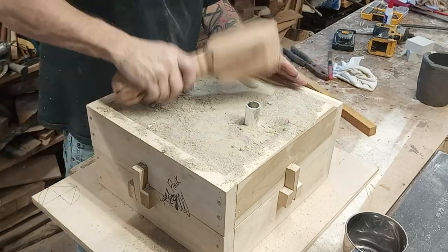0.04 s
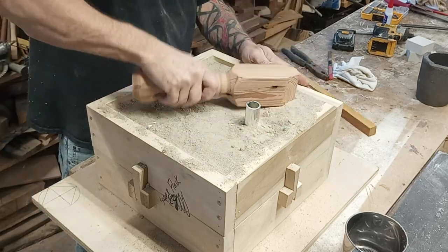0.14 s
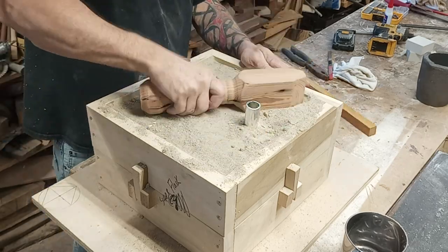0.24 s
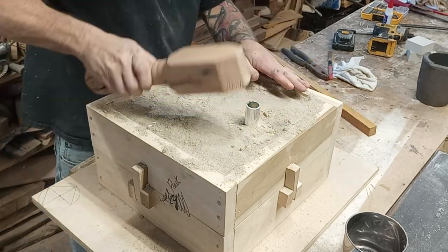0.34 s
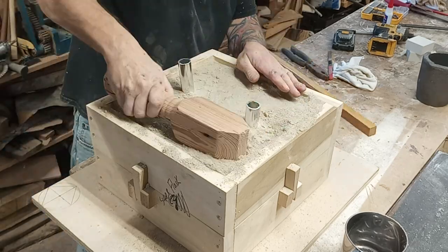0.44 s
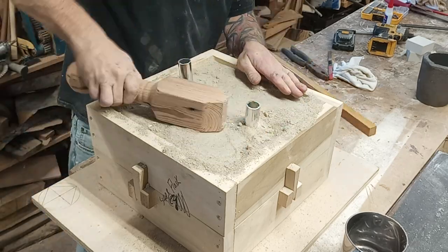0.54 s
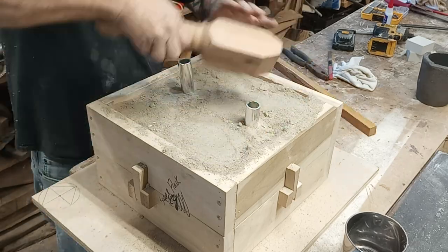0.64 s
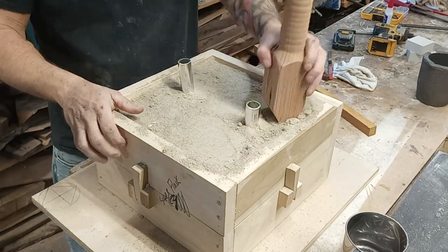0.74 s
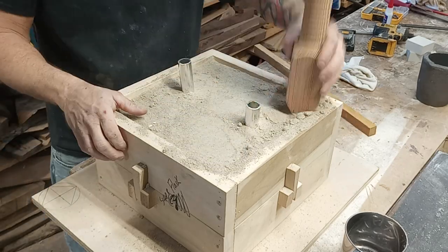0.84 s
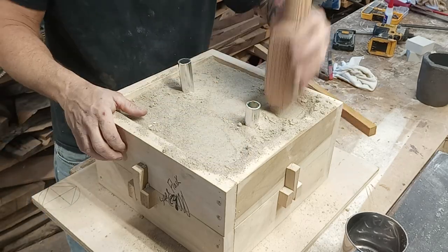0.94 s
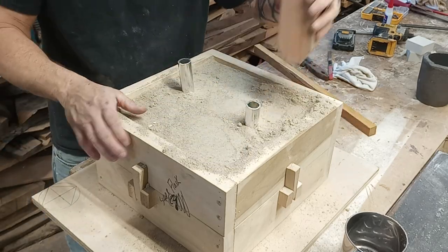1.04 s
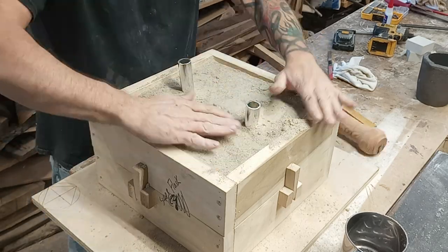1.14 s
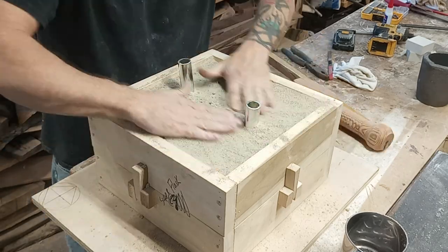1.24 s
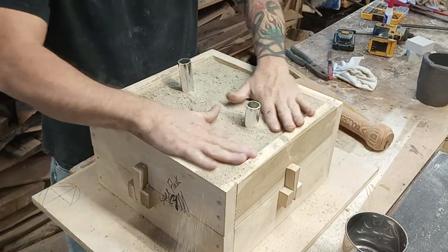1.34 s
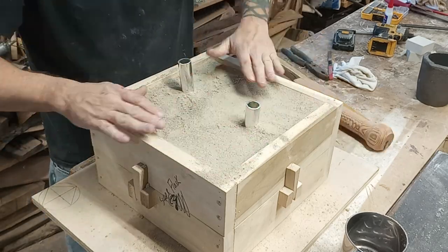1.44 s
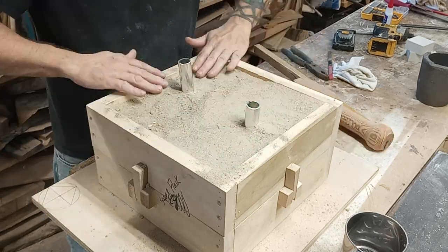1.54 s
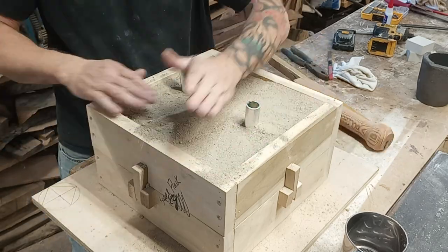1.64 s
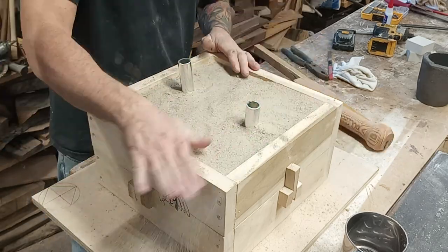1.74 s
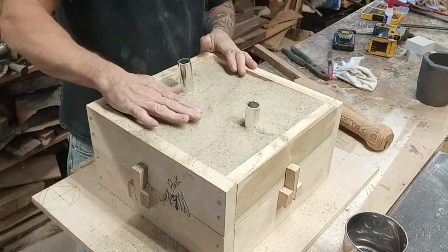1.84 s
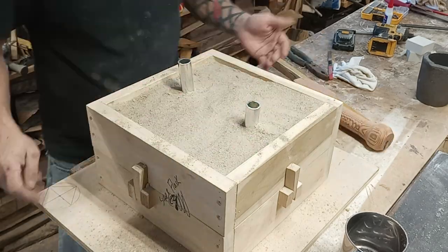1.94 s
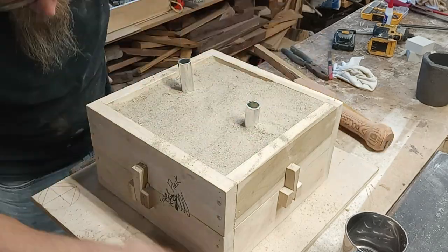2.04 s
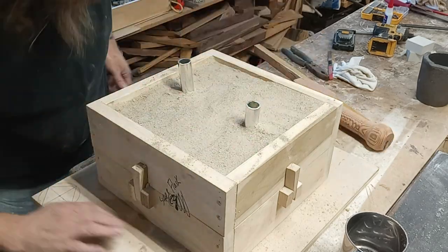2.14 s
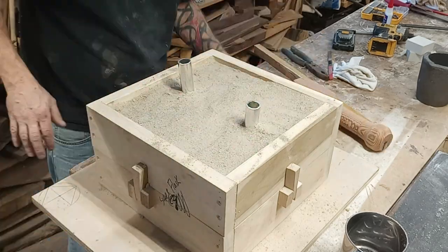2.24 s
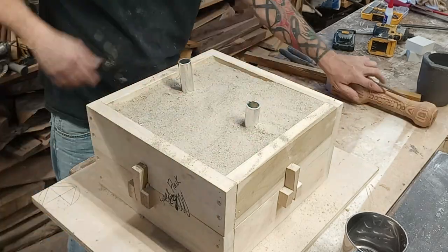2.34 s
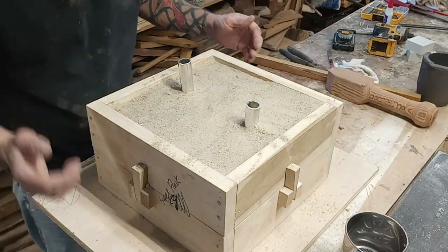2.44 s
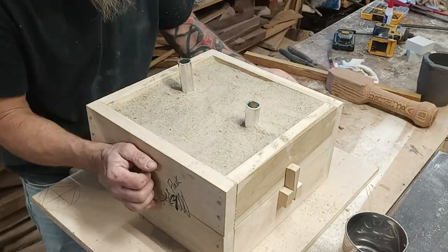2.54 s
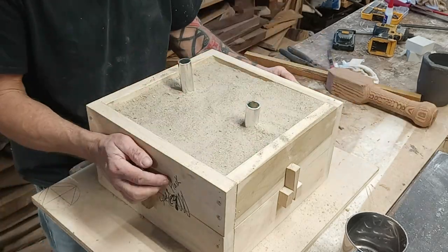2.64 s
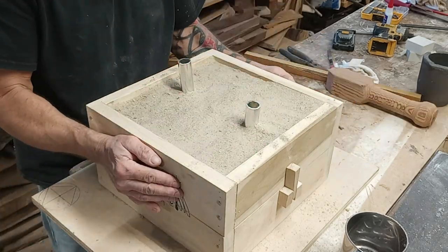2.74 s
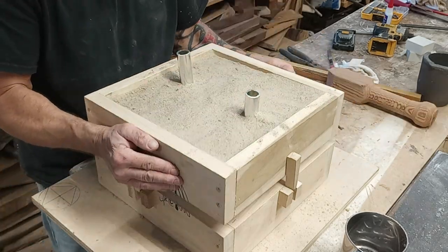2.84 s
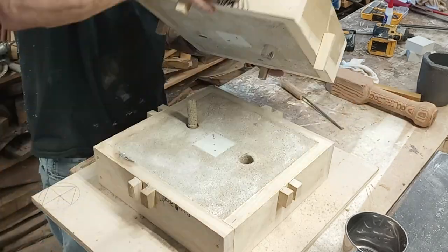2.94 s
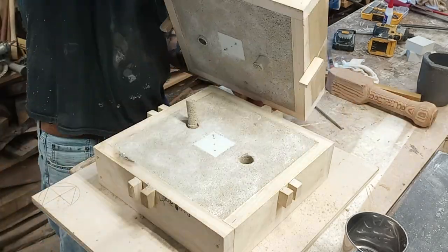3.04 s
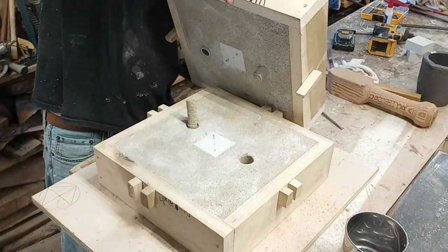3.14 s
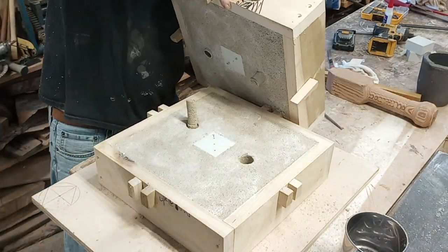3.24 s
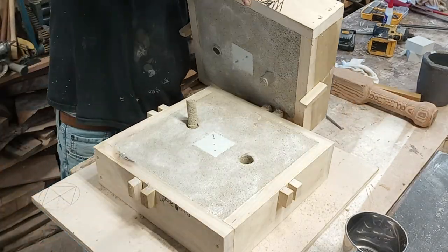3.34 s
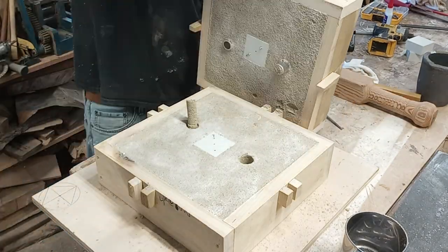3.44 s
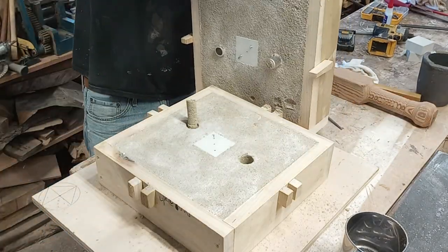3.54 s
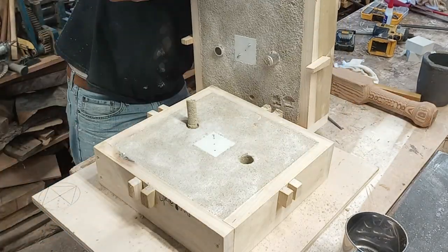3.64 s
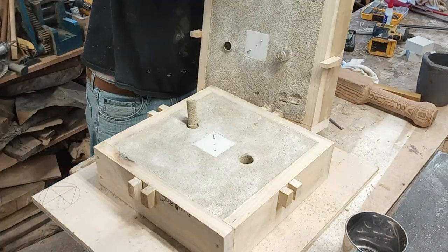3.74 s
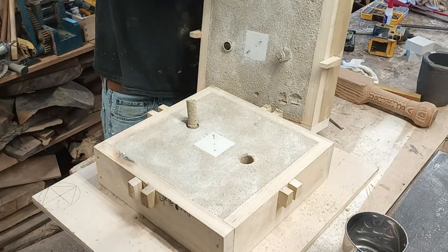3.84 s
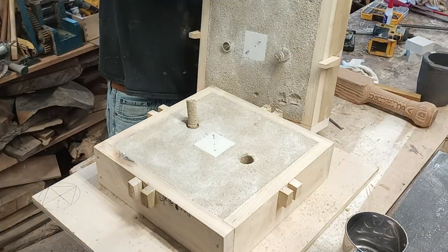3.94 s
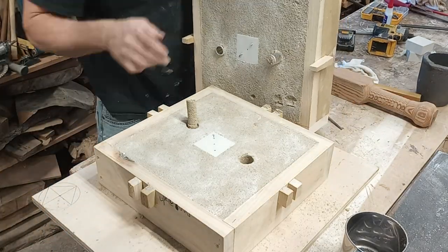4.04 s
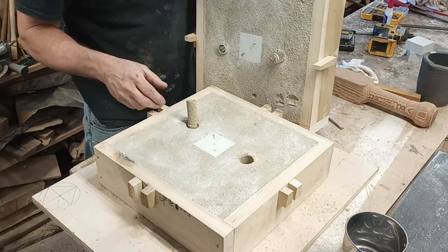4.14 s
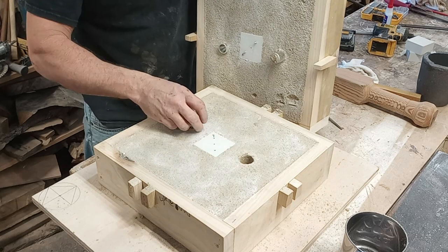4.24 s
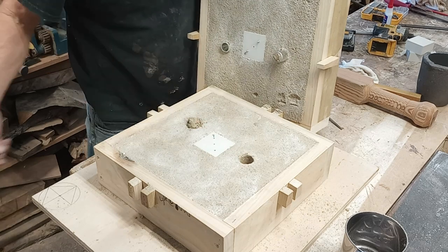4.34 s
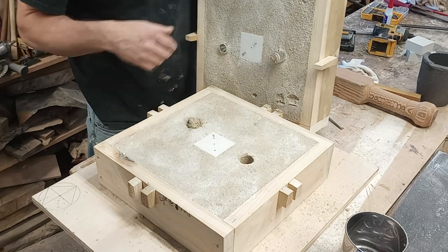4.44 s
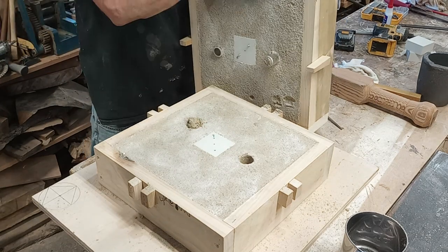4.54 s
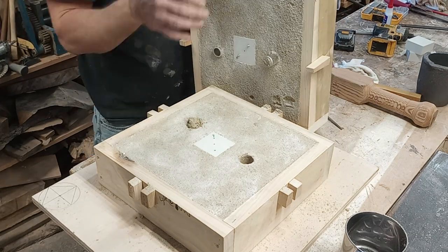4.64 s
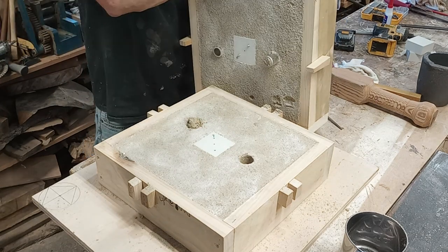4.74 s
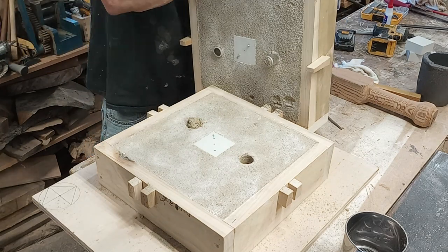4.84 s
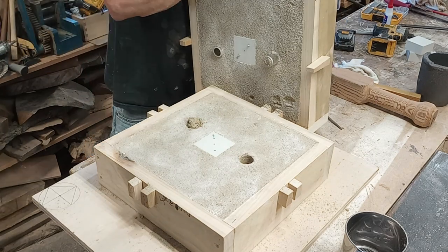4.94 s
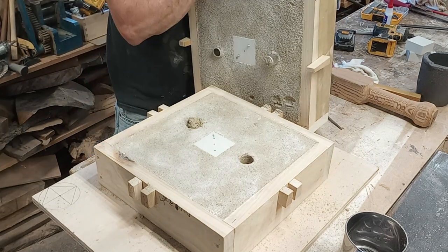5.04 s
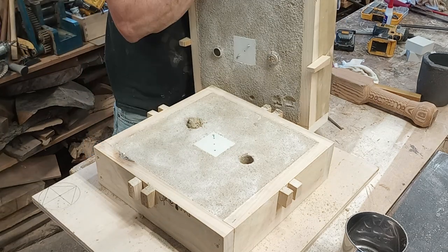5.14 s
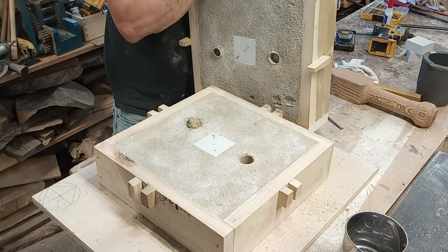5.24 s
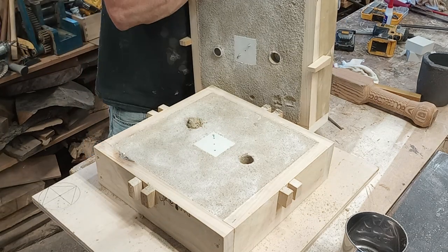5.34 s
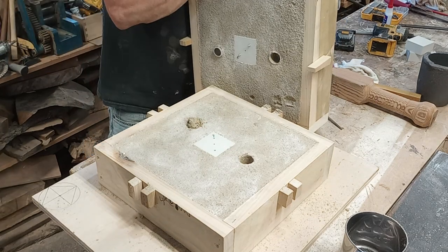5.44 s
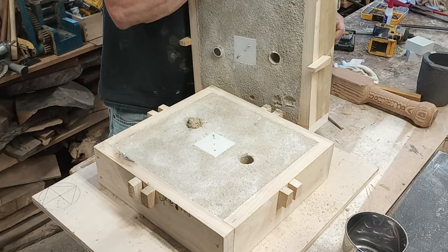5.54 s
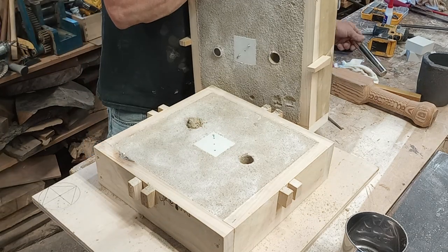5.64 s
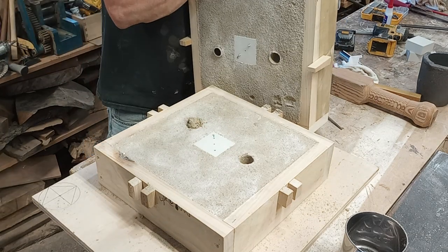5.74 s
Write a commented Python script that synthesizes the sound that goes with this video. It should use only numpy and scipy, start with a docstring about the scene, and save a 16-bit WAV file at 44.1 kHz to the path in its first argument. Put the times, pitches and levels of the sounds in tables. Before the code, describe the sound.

Close to a workbench, a wooden rammer tamps sand in a wooden box in very quick, uneven thumps with gritty crunch and hard woody knocks, ending just after one second. Short hissing hand sweeps follow, then the box is shoved and judders free. Faint scrapes give way to low wavering hum and ventilation, until one sharp knock near the end.

```python
"""Packing sand into a moulding box

A wooden rammer packs sand into a wooden moulding box in very quick, short strokes. Each is a resonant thump,
a chatter of tiny contacts through wood modes and a crunch of filtered grains; sharp knocks ring the same wood.
Hands sweep loose sand away as swells of hiss, over a faint trickle. The upper box is shoved, judders off its
guide pins and is stood on edge; one last knock sounds over filtered workshop noise and wavering low hum."""
import sys
import numpy as np
from scipy import signal
from scipy.fft import rfft, irfft
from scipy.io import wavfile
from scipy.ndimage import uniform_filter1d

SR = 44100
rng = np.random.default_rng(int(sys.argv[2]) if len(sys.argv) > 2 else 0)


def store_pcm(level_fs):
    """Save levels as 16-bit WAV."""
    pcm = np.round(np.clip(level_fs, -1, 1) * 32767).astype(np.int16)
    wavfile.write(sys.argv[1], SR, np.atleast_2d(pcm).T)


N = 255339  # samples in the scene
SIZE = 8192  # samples in one short sound
T = np.arange(SIZE) / SR
HZ = np.maximum(np.fft.rfftfreq(SIZE, 1 / SR), 1)
LONG_HZ = np.maximum(np.fft.rfftfreq(N, 1 / SR), 1)

# modes of the sand-filled box: (frequency [Hz], width [Hz], level [dB])
BOX_MODES = [(363, 202, -1), (499.2, 163, -1), (590.8, 53, -2.5), (686, 48, -7.5), (770, 80, -9),
             (949, 230, -16)]
# modes of the hardwood rammer and the stiff frame corners: (frequency [Hz], width [Hz], level [dB])
HARDWOOD_MODES = [(1064, 72, 4.5), (1277, 73, 1.5), (1409, 140, 2), (1527, 150, 3), (1900, 190, -6),
                  (2294, 130, -10.5), (2560, 660, -19), (3320, 57, -22)]
# spectrum of boards rubbed by sand: (frequency [Hz], level [dB])
RUB_SPECTRUM = [(150, -13), (400, -4), (600, 0), (760, -4), (980, 1), (1500, -2), (2100, -6), (3400, -24)]
# spectrum of grains skidding over wood: (frequency [Hz], level [dB])
HISS_SPECTRUM = [(1100, -15.5), (2100, 0), (3150, 1), (4300, 0.5), (5800, 4.5), (6800, 0.5), (8000, -19),
                 (12000, -37.5)]
# spectrum of the finest dust: (frequency [Hz], level [dB])
DUST_SPECTRUM = [(5500, -19), (8300, -7.5), (11000, -4), (14000, -3.5), (15100, 2), (16500, 0)]


def undb(db):
    """Decibels to gain."""
    return 10 ** (np.asarray(db) / 20)


def between(ends, hardness):
    """Slide from the soft value to the hard one."""
    return ends[0] + (ends[1] - ends[0]) * hardness


def gains(points, hz):
    """Gain of a (Hz, dB) spectrum, interpolated over log frequency."""
    f, db = np.transpose(points)
    return undb(np.interp(np.log(hz), np.log(f), db))


def causal(gain):
    """Minimum-phase response with this gain: nothing sounds before the contact."""
    cepstrum = irfft(np.log(gain + 1e-6))
    cepstrum[1:SIZE // 2] *= 2
    cepstrum[SIZE // 2 + 1:] = 0
    return np.exp(rfft(cepstrum))


def resonance(hz, width, f=HZ):
    """Response of one damped mode, gain 1 at its centre."""
    return 1 / (1 + 1j * (f / hz - hz / f) * hz / width)


def body(modes, place_db, detune):
    """Modes as met from one striking place; the response falls away outside their range."""
    hz, width, db = np.transpose(modes)
    total = 0
    for k in range(len(hz)):
        level_chance, pitch_chance = rng.standard_normal(2)
        gain = (-1) ** k * undb(db[k] + place_db * level_chance)  # neighbours in opposite phase
        total = total + gain * resonance(hz[k] * (1 + detune * pitch_chance), width[k])
    return total * resonance(np.sqrt(hz[0] * hz[-1]), 2.4 * (hz[-1] - hz[0]))


def grains(rate, scatter_db):
    """Tiny contacts at random moments (rate per second), a few much harder than the rest."""
    hit = rng.random(SIZE) < rate / SR
    return hit * rng.choice([-1, 1], SIZE) * undb(scatter_db * rng.standard_normal(SIZE))


def pressure(length, peak):
    """Contact pressure: rises until the share `peak` of its length, then lets go."""
    peak = np.clip(peak, .05, .9)
    return np.sin(np.interp(T / length, [0, peak, 1], [0, np.pi / 2, np.pi]))


def radiate(force, response, db, length, bench_s=0.0014):
    """A force sounds through a body at an rms level; quick reflections off the bench make the two ears differ."""
    # side against mid: (frequency [Hz], level [dB])
    side_spectrum = [(60, -21), (130, -19), (260, -14), (500, -6), (1000, 0), (2000, 1), (5000, 0),
                     (15000, -.5)]
    mid = rfft(force) * response
    mirrored = mid * rfft(rng.standard_normal(SIZE) * np.exp(-T / bench_s))
    match = np.linalg.norm(mid) / (np.linalg.norm(mirrored) + 1e-18)
    side = mirrored * match * causal(gains(side_spectrum, HZ))
    pair = irfft(np.array([mid + side, mid - side]))
    pair *= np.minimum(1, 2 * (1 - T / T[-1]))  # fade the second half out
    return pair * undb(db) * np.sqrt(length * SR / (np.sum(pair ** 2) / 2 + 1e-18))


def add(out, s, sound):
    """Mix a sound in at its time in seconds."""
    i = max(int(s * SR), 0)
    out[:, i:i + SIZE] += sound[:, :N - i]


def thud(hz, db, length, damping, settle_db):
    """The packed box is pushed once and swings a few times; the sand settles under the push in small slips."""
    width = damping / length
    push = np.exp(-((T - .24 * length) / 0.00056) ** 2)
    packed_box = resonance(hz, width) * resonance(0.82 * hz, 1.54 * width)
    swing = radiate(-push, packed_box, db - 4.0, length)
    slips = grains(4000, 3) * pressure(length, .42)
    deep_sand = resonance(0.32 * hz, 190) * resonance(130, 930)
    return swing + radiate(slips, deep_sand, db + settle_db, length)


def strokes():
    """The rammer thumps the sand, chatters over the wood and crushes grains for as long as it presses."""
    # rammer strokes, then shoves of the box:
    # (time [s], length [s], strength [dB], hardness [0 = into deep sand, 1 = wood on wood])
    stroke_list = [(.001, 0.012, -18, 0.53), (.015, 0.021, -29, 0.61), (0.088, 0.02, -27.5, 0.82),
                   (0.111, 0.022, -25.5, .65), (.143, 0.02, -25.5, 0.66), (.169, .015, -24.5, 0.65),
                   (.192, .016, -19.5, 0.14), (.225, .022, -20, 0.68), (.251, .023, -19.5, 0.47),
                   (0.279, 0.021, -18, 0.5), (.303, .025, -18.5, 0.84), (.328, 0.021, -27.5, 0.89),
                   (.347, .031, -22, 0.74), (.429, 0.01, -38, 0.37), (.455, 0.015, -37.5, 0.57),
                   (.479, 0.021, -24, 0.56), (.515, .029, -26.5, 0.84), (.554, 0.012, -22.5, 0.8),
                   (.573, 0.032, -22.5, 0.69), (.632, 0.014, -22.5, 0.63), (.651, 0.024, -20, 0.7),
                   (.686, .012, -25.5, 0.96), (.785, 0.061, -32.5, 0.078), (0.853, 0.026, -23.5, 0.4),
                   (0.88, .02, -29.5, 0.075), (0.907, 0.031, -29.5, 0.23), (.957, 0.0141, -19.5, 0.45),
                   (.974, .023, -19.5, 0.32), (1.008, 0.02, -18.5, 0.066), (1.031, 0.016, -27.5, 0.11),
                   (1.05, .02, -24.5, 0.18), (1.074, .024, -21, 0.39), (1.152, 0.015, -19.5, 0.51),
                   (1.181, 0.033, -23, 0.68), (1.219, .016, -14.5, .4), (2.35, .024, -22.5, 0.644),
                   (2.367, 0.031, -19, 0.49), (2.425, 0.042, -36, 0.56), (2.472, 0.035, -29, 0.68)]
    # thud pitch: (at hardness 0 [Hz], at hardness 1 [Hz])
    thud_pitch = (190.3, 300.1)
    # chatter of box and hardwood, relative to the strength: (at hardness 0 [dB], at hardness 1 [dB])
    box_chatter = (-20, 3.5)
    wood_chatter = (-46.5, 3)
    # crunch of loose sand relative to the strength, low where the face is packed: (time [s], level [dB])
    loose_sand = [(0, -17.5), (.02, -20), (.165, -45), (.2, -16), (.44, -33), (.48, -14), (.58, -19),
                  (.635, -35.5), (.7, -14), (1.15, -21), (1.22, -28.5), (2.35, -9), (2.37, -27.5),
                  (2.43, -48)]
    # spectrum of crushed sand: (frequency [Hz], level [dB])
    crunch_spectrum = [(900, -20), (2200, -1), (4000, 2), (6300, 3.5), (7800, -2.5), (11000, -1),
                       (14000, 0), (15200, 7), (16500, -7.5)]
    out = np.zeros((2, N))
    crunch = causal(gains(crunch_spectrum, HZ))
    for s, length, thud_db, hardness in stroke_list:
        hz = between(thud_pitch, hardness)
        box_db = thud_db + between(box_chatter, hardness)
        wood_db = thud_db + between(wood_chatter, hardness)
        sand_db = thud_db + np.interp(s, *np.transpose(loose_sand))
        press = pressure(length, 0.37)
        chatter = grains(4000, 4) * press ** 1.8
        crushed = grains(15000, 7.0) * press ** 0.82
        sound = thud(hz, thud_db, length, damping=1.9, settle_db=-9.0)
        sound += radiate(chatter, body(BOX_MODES, 2.2, .03), box_db, length)
        sound += radiate(chatter, body(HARDWOOD_MODES, 2.17, 0.018), wood_db, length)
        sound += radiate(crushed, crunch, sand_db, length)
        add(out, s, sound)
    return out


def knocks(length=0.0057, rattle_s=0.01, rattle=0.0839, crack_s=0.0036):
    """One hard contact rings all the wood at once; the loose joints rattle and crushed grit cracks."""
    # hard wood-on-wood blows: (time [s], strength [dB], hardness [0-1])
    blow_list = [(.0545, -20.5, .35), (.138, -19, .4), (.311, -23, .7), (.572, -11.5, 0.66),
                 (.655, -20.5, .5), (1.168, -11, 0.64), (1.2212, -19.5, .1), (2.472, -25, 0.98),
                 (2.511, -37.5, 0.97), (3.393, -41, 0.2), (3.563, -52, 0.65), (5.7201, -13.5, 0.79)]
    # thud pitch: (at hardness 0 [Hz], at hardness 1 [Hz])
    knock_pitch = (240, 320)
    # hardwood ring and grit crack, relative to the strength: (at hardness 0 [dB], at hardness 1 [dB])
    wood_ring = (-28, 1.5)
    grit_crack = (-26, -6.5)
    # spectrum of cracking grit: (frequency [Hz], level [dB])
    crack_spectrum = [(1200, -14), (2200, 1), (3600, 0), (4600, -9), (6200, -14), (8000, -30), (12000, -28),
                      (16000, -30)]
    out = np.zeros((2, N))
    crack = causal(gains(crack_spectrum, HZ))
    bench = resonance(105, 70) * resonance(120, 300)
    for s, thud_db, hardness in blow_list:
        hz = between(knock_pitch, hardness)
        wood_db = thud_db + between(wood_ring, hardness)
        crack_db = thud_db + between(grit_crack, hardness)
        blow = rattle * grains(5996, 4.23) * np.exp(-T / rattle_s)
        blow -= np.exp(-((T - .0002) / .00006) ** 2) / 2  # the contact itself
        grit = grains(23000, 4.3) * np.exp(-T / crack_s)
        boards = body(BOX_MODES, 1, .02) * resonance(850, 700)
        sound = radiate(blow, resonance(hz, 190) * resonance(0.42 * hz, 870), thud_db, length)
        sound += radiate(blow, bench, thud_db - 15, length)  # the bench gives a little
        sound += radiate(blow, boards, thud_db - 5, length)
        sound += radiate(blow, body(HARDWOOD_MODES, 1, .03), wood_db, length)
        sound += radiate(grit, crack, crack_db, length)
        add(out, s, sound)
    return out


def judder(rate=1500, fade_s=0.027):
    """Wood sticks and slips on the guide pins, weaker as the box comes free."""
    # the upper box judders up its wooden guide pins: (time [s], length [s], level [dB])
    judder_event = (2.471, 0.035, -30)
    # modes of the guide pins: (frequency [Hz], width [Hz], level [dB])
    pin_modes = [(1180, 82, 1), (1480, 78, -7), (1640, 70, -1), (2215, 90, 0), (2430, 120, 1.5),
                 (2648, 38, 3.5), (2870, 98, 0.5)]
    s, length, db = judder_event
    out = np.zeros((2, N))
    slips = grains(rate, 3) * np.exp(-T / fade_s) * (T < length)
    add(out, s, radiate(slips, body(pin_modes, 0.87, .003), db, length))
    return out


def sweeps(swell=2.94):
    """Loose grains skid over the boards: a quick swell of hiss that trails away."""
    # sand brushed, slid or spilled over wood:
    # (time [s], nominal length [s], hiss level [dB], lightness [dB, up = fine dust, down = rubbed boards])
    sweep_list = [(0.703, 0.021, -52, 5), (1.315, 0.022, -68, -3), (1.418, 0.022, -64.5, 7),
                  (1.453, 0.038, -57, 2.5), (1.764, 0.023, -59.5, 4), (1.791, 0.017, -33.5, 5),
                  (1.798, 0.076, -44, 3.5), (1.915, 0.048, -50.5, 4), (1.939, .12, -54, 1.5),
                  (2.059, 0.03, -48, -6.5), (2.102, 0.028, -54.5, -2.5), (2.14, 0.049, -35.5, -1),
                  (2.211, 0.024, -54, -8.5), (2.24, 0.063, -61, 2), (2.291, .021, -43, -6.5),
                  (2.544, .038, -35.5, 3.5), (2.574, 0.097, -65.5, 5.5), (3.037, 0.068, -57.5, 9),
                  (3.355, .022, -41, 1), (3.376, 0.049, -47.5, -2.5), (3.462, .035, -64, -1.5),
                  (3.555, 0.034, -72.5, -13), (3.703, 0.04, -68, -5.5), (4.13, 0.016, -73, 9.5),
                  (4.62, .013, -65.5, 4.5)]
    # gentle sweeps swell slowly, brisk ones start sooner: (hiss level [dB], share of the length spent rising)
    rise_share = [(-53, 0.25), (-42.5, 0.12)]
    out = np.zeros((2, N))
    rub = causal(gains(RUB_SPECTRUM, HZ))
    hiss = causal(gains(HISS_SPECTRUM, HZ))
    dust = causal(gains(DUST_SPECTRUM, HZ))
    for s, length, hiss_db, light_db in sweep_list:
        board_db = hiss_db - 0.5 - light_db
        dust_db = hiss_db - 2.5 + light_db
        attack = np.interp(hiss_db, *np.transpose(rise_share))
        flow = pressure(1.505 * length, attack) ** swell
        skid = grains(14000, 3.2) * flow
        sound = radiate(grains(4500, 2) * flow, rub, board_db, length)
        sound += radiate(skid, hiss, hiss_db, length)
        sound += radiate(skid, dust, dust_db, length)
        add(out, s, sound)
    return out


def walk(rate):
    """Slow random drift with a spread near 1, drawing `rate` new values a second."""
    k = int(SR / rate)
    steps = np.repeat(rng.standard_normal(N // k + 1), k)
    return np.sqrt(1.5) * uniform_filter1d(steps, k)[:N]


def trickle():
    """Loose grains keep shifting under the work, as uneven noise in the colours of hiss, dust and rubbing."""
    # faint trickle while the hands work, before a 5.5 dB cut: (time [s], level [dB])
    trickle_level = [(0, -67), (1.4, -69.5), (1.9, -61.5), (2.6, -59), (2.8, -72.5), (3.85, -78)]
    grit = rng.standard_normal((2, N)) * undb(3 * rng.standard_normal(N))
    colour = gains(HISS_SPECTRUM, LONG_HZ)
    colour += undb(-2.5) * gains(DUST_SPECTRUM, LONG_HZ)
    colour += undb(-0.5) * gains(RUB_SPECTRUM, LONG_HZ)
    grit = irfft(rfft(grit) * colour, N)
    db = np.interp(np.arange(N) / SR, *np.transpose(trickle_level), right=-120)  # silent after the last point
    return grit / grit.std() * undb(db - 5.5 + walk(30))


def room(dry, t60, wet_db, dull_hz):
    """The room returns only a short, dull tail: decaying low-passed noise, different at each ear."""
    tail = rng.standard_normal((2, SIZE)) * undb(-60 * T / t60) * (T > .004)
    tail = signal.lfilter(*signal.butter(1, dull_hz, fs=SR), tail)
    tail *= undb(wet_db) / np.sqrt(np.sum(tail ** 2) / 2)
    return dry + signal.fftconvolve(dry, tail, axes=1)[:, :N]


def workshop():
    """Low ventilation rumble as shaped noise, with a few thin whines and a wavering machine hum."""
    # spectrum of the shop air: (frequency [Hz], level [dB])
    air_spectrum = [(15, -36), (25, -5), (49, -1), (97, -5), (130, -3), (153, -11), (256, -7), (293, -12.5),
                    (531, -19), (607, -15.5), (775, -28.5), (5000, -46.5), (8590, -53.5), (11900, -51),
                    (16000, -51)]
    # side against mid: (frequency [Hz], level [dB])
    air_width = [(60, -14.5), (110, -11), (200, -11.5), (380, -5.5), (700, -3), (1290, 1), (2380, -1),
                 (4400, 0.5), (8120, 0), (15000, -0.5)]
    # faint, thin whines above the room noise: (frequency [Hz], width [Hz], level [dB])
    whine_modes = [(1650, 54, -0.5), (3204, 200, 8.5), (5000, 590, 3.5), (6060, 2200, 2)]
    # mains and motor hum, around which pitch and level waver: (frequency [Hz], level [dB])
    hum_tones = [(43, -67.5), (129, -67), (253, -73.5), (602, -79)]
    whines = sum(undb(db) * abs(resonance(hz, width, LONG_HZ)) ** 2 for hz, width, db in whine_modes)
    mid, side = rfft(rng.standard_normal((2, N))) * gains(air_spectrum, LONG_HZ) * (1 + whines)
    side = side * gains(air_width, LONG_HZ)
    air = irfft(np.array([mid + side, mid - side]), N)
    air *= undb(-57.5) / air.std()
    hum = np.zeros(N)
    for hz, db in hum_tones:
        level = undb(db + 2 * walk(9)) * np.sqrt(2)  # rms to peak
        phase = 2 * np.pi * np.cumsum(hz + 3 * walk(15)) / SR
        hum += level * np.sin(phase)
    return air + hum


def scene():
    """Work on the bench, a little brighter on the right, in the humming shop."""
    # left minus right: (frequency [Hz], level [dB])
    balance = [(250, 0), (1000, -1), (3500, 0.5), (6000, -2), (9000, -5), (15000, -9.5)]
    bench_work = strokes() + knocks() + judder() + sweeps() + trickle()
    work = room(bench_work, t60=0.069, wet_db=-21, dull_hz=3670)
    tilt = gains(balance, LONG_HZ)
    ears = np.array([tilt, np.ones_like(tilt)]) / np.sqrt((1 + tilt ** 2) / 2)  # keeps the summed power
    return irfft(rfft(work) * ears, N) + workshop()


def record(dry):
    """A steep elliptic low-pass cuts the top above 15.6 kHz."""
    return signal.sosfilt(signal.ellip(10, .2, 80, 15600, fs=SR, output="sos"), dry)


dry = scene()
out = record(dry)
store_pcm(out)
```